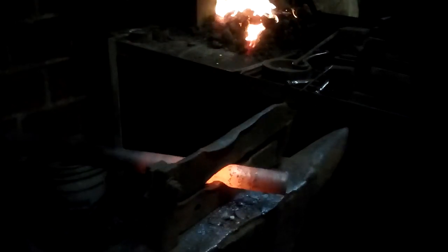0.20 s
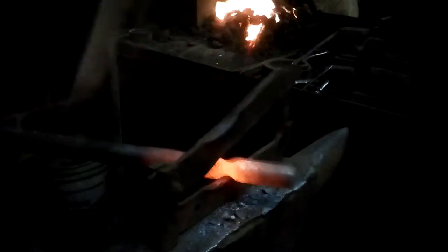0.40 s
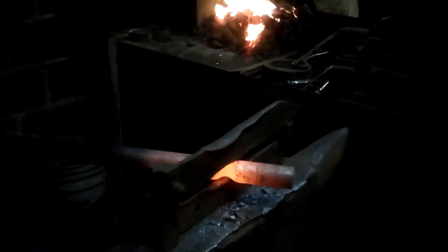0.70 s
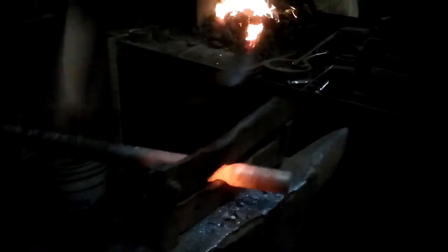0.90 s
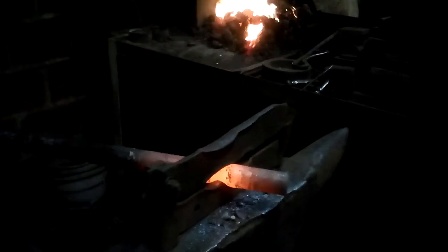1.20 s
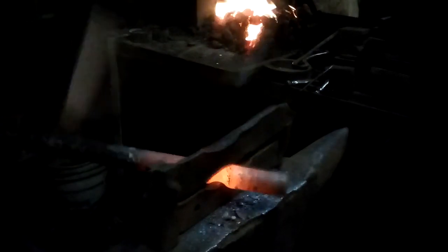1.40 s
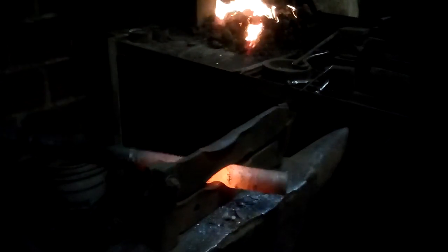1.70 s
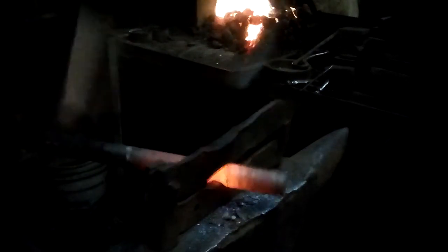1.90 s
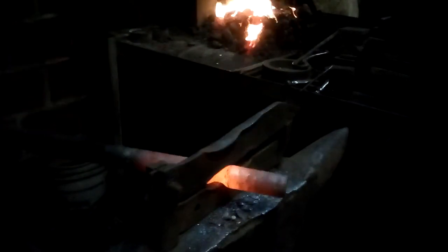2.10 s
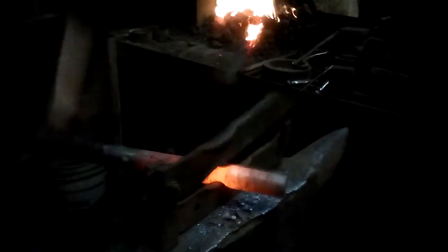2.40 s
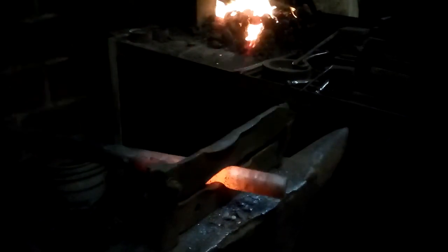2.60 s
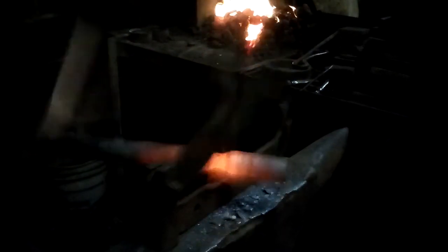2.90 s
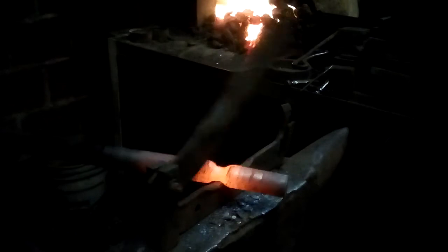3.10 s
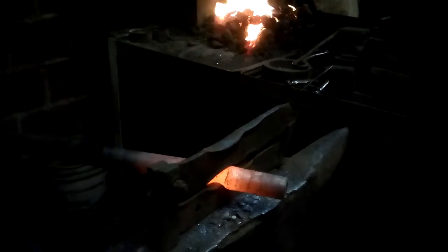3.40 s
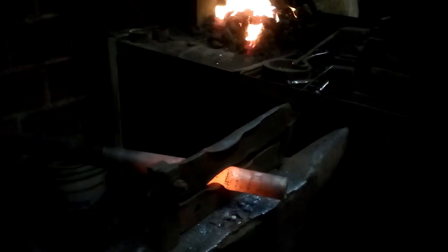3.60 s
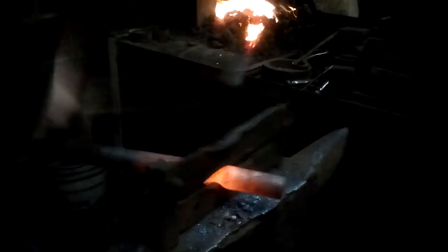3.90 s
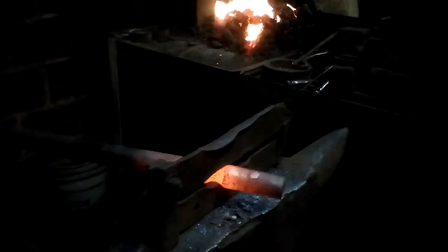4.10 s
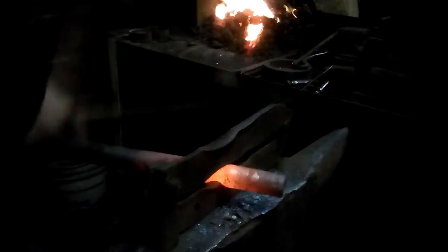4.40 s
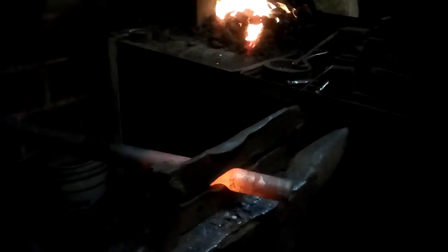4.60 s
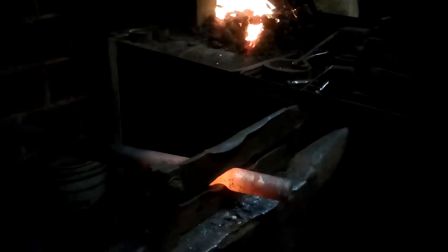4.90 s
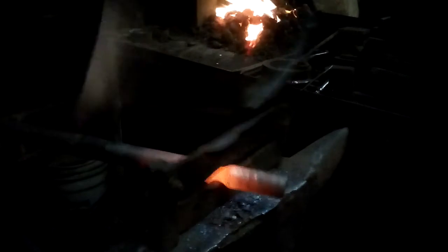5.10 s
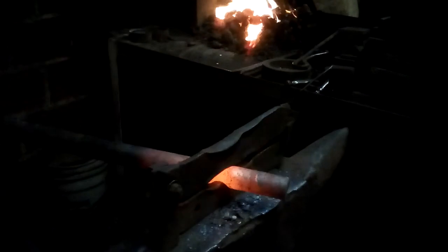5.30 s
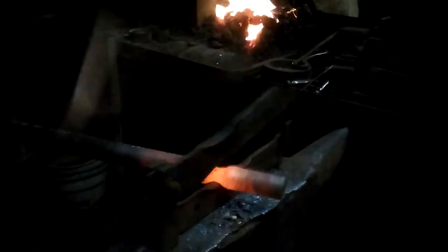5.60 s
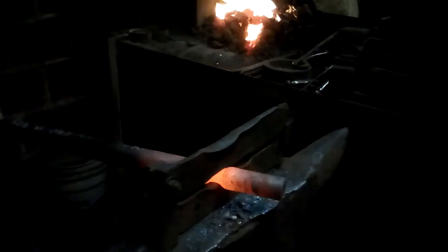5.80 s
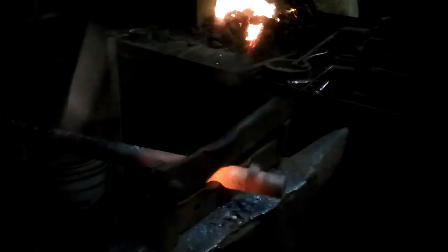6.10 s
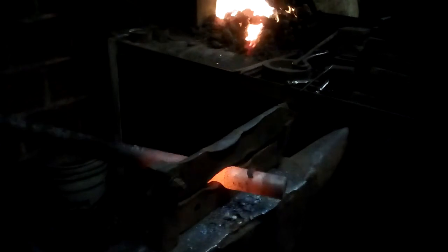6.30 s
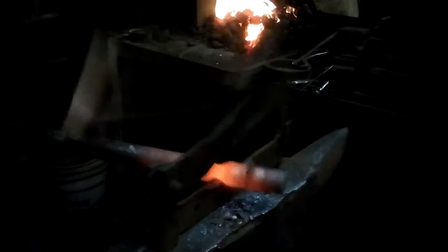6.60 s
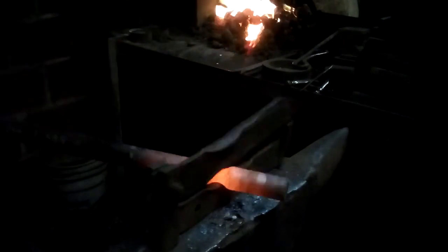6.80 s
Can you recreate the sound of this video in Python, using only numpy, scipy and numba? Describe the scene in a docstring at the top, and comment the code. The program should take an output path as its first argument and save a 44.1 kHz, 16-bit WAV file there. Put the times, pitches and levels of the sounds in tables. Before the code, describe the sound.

A hand hammer strikes a steel die on hot pipe about twice a second, bright ringing clangs with small rattles between, low fire murmur behind.

```python
"""A closed forge shop, one microphone near the anvil: the direct sound stands above the room's answer.
A hand hammer drives a steel die onto hot pipe about twice a second: noise-like clang and ringing modes.
The die rings, rebounds and rattles between blows; the pipe scrapes, and a coal fire murmurs behind.
The camera's gain control dives after every blow, holds the ringing at one level until it is fully open
again, and compressor and limiter flatten the first cycles."""
import sys
import numpy as np
from scipy import signal
from scipy.fft import rfft, irfft, next_fast_len
from scipy.io import wavfile
from scipy.ndimage import uniform_filter1d, minimum_filter1d, map_coordinates
from numba import njit

SR = 44100
rng = np.random.default_rng(int(sys.argv[2]) if len(sys.argv) > 2 else 0)


def unload_wav(signal):
    """Save mono or channel-first audio to the path in sys.argv[1] as 16-bit WAV at rate SR, clipped to [-1, 1]."""
    wavfile.write(
        sys.argv[1],
        SR,
        np.round(np.clip(np.atleast_2d(signal).T, -1, 1) * 32767).astype(np.int16),
    )


def how_loud(loudness_db):
    """Turn decibels into a plain amplitude multiplier (0 dB gives 1, 20 dB gives 10)."""
    steps = np.asarray(loudness_db, float) / 20
    return 10 ** steps


N = 306570  # length in samples


def unit(x):
    """Scaled to rms 1."""
    return x / np.sqrt(np.mean(x ** 2) + 1e-20)


def along(points, hz):
    """Reads (Hz, value) points on a log frequency axis."""
    f, v = np.transpose(points)
    return np.interp(np.log(hz + 1), np.log(f + 1), v)


def filtered(x, response):
    """x times a complex response of frequency."""
    m = next_fast_len(len(x) + 8192)
    return irfft(rfft(x, m) * response(np.fft.rfftfreq(m, 1 / SR)), m)[:len(x)]


def dying(noise, t60s):
    """Noise in which every frequency dies at its own speed."""
    hz, t, z = signal.stft(noise, SR, nperseg=256)
    fade = how_loud(-60 * t / along(t60s, hz)[:, None])
    return signal.istft(z * fade, SR, nperseg=256)[1][:len(noise)]


# The shop's reverberation: (frequency [Hz], time to fall 60 dB [s])
SHOP_T60 = [(200, 0.46), (3000, 0.5), (8000, .3), (12000, 0.15)]


def add(track, s, sound, wet_db):
    """Lays a sound at s seconds, with the shop's answer: a fresh tail of noise whose treble dies first."""
    tail = np.pad(dying(rng.standard_normal(len(sound)), SHOP_T60), (300, 0))  # starts 300 samples late
    answer = signal.fftconvolve(sound, tail / np.linalg.norm(tail))[:len(sound)]
    heard = sound + how_loud(wet_db) * answer
    start = round(s * SR)
    heard = heard[max(-start, 0):N - start]
    track[max(start, 0):][:len(heard)] += heard


# Fire and draught behind the anvil, and the camera's hiss: (frequency [Hz], relative density [dB per Hz])
FIRE_SPECTRUM = [(18, -28.5), (40, -2), (200, -1), (370, -9.5), (520, -18), (700, -12), (1400, -18),
                 (3600, -21), (6200, -21), (7900, -36), (10000, -55), (13500, -62), (15200, -28),
                 (16500, -36)]


def fire():
    """The coal fire and its draught: noise shaped to a low murmur, its level wavering slowly."""
    waver = map_coordinates(rng.standard_normal(60), [np.arange(N) * 6 / SR])  # six random points a second
    murmur = unit(filtered(rng.standard_normal(N), lambda hz: how_loud(along(FIRE_SPECTRUM, hz))))
    return how_loud(-53 + 3 * waver) * murmur


# The rub of pipe dragged on the anvil: (frequency [Hz], relative density [dB per Hz])
SCUFF_SPECTRUM = [(80, -28), (200, 15), (600, 3), (1500, 0), (3000, -40.5)]
# The pipe shifts on the anvil: (time [s], level before fading [dB], time to fall 60 dB [s])
PIPE_SHIFTS = [(3.999, -47, 0.44), (4.899, -35.5, 0.37)]


def scuff():
    """The pipe is shifted: soft, low scrapes of noise that swell in milliseconds and fade."""
    track, t = np.zeros(N), np.arange(SR // 2) / SR
    for s, db, t60 in PIPE_SHIFTS:
        rub = unit(filtered(rng.standard_normal(len(t)), lambda hz: how_loud(along(SCUFF_SPECTRUM, hz))))
        swell = 1 - np.exp(-t / 0.0035)
        add(track, s, swell * how_loud(db - 60 * t / t60) * rub, wet_db=-4.5)
    return track


MAIN_HZ = 4050  # centre of the loudest ring, heard while the die is off the pipe; pivot of the tilts
# Modes of the steel die: (frequency [Hz], relative level [dB])
DIE_MODES = [(942, -21), (1655, -16), (1846, -13), (2358, -12), (2575, -13), (2850, -13), (3060, -14),
             (3190, -12), (3235, -10), (3612, -12), (4048, -6), (4480, -11), (4565, -8), (5095, -14),
             (5163, -10), (5475, -9), (6089, -12), (7305, -14), (7757, -19), (8613, -22), (8888, -23),
             (9631, -28), (11047, -28), (11854, -25), (12979, -27), (13722, -31), (13900, -26),
             (14621, -23), (15025, -24), (15595, -20)]


def strengths(scatter_db, tilt_db, favoured_hz):
    """Each contact excites the modes anew, slightly repitched; the one nearest favoured_hz is always strong."""
    hz, db = np.transpose(DIE_MODES)[..., None]
    chance = rng.standard_normal((2, len(DIE_MODES), 1))
    distance_hz = abs(hz - favoured_hz)
    favoured = distance_hz == distance_hz.min()
    tilt = tilt_db * np.log2(hz / MAIN_HZ)
    db = db + tilt + np.where(favoured, 11, scatter_db * chance[0])
    return hz * (1 + 0.00095 * chance[1]), db


# Decay of the die's modes, before any extra damping: (frequency [Hz], time to fall 60 dB [s])
DIE_DECAY = [(1000, .5), (4000, .45), (9000, .27), (15000, .2)]


def ring(t, hz, db):
    """The die's modes ringing freely: a sum of dying sines."""
    fade = how_loud(db - 60 * t / along(DIE_DECAY, hz))
    return np.sum(fade * np.sin(2 * np.pi * hz * t), 0)


# Light rattles of die, pipe and tongs: (time [s], level [dB], centre frequency [Hz])
RATTLES = [(0.422, 2, 2380), (0.548, -8.5, 1880), (0.5615, 0, 3120), (0.826, -23, 2620),
           (0.985, -0.5, 3500), (1.222, -31, 1520), (1.69, -16, 3520), (1.75, -23, 1450),
           (1.8757, -15, 3000), (2.218, -19.5, 3300), (2.447, 8, 3030), (2.525, -6, 2600),
           (2.6956, -15, 3370), (2.746, -18.5, 2940), (2.806, -20, 3080), (3.036, -2.5, 2430),
           (3.099, -9, 3000), (3.778, -38, 3940), (3.852, -20, 3120), (4.56, -1, 3600), (4.611, -4, 4000),
           (4.958, -24.5, 2780), (5.233, -5, 3080), (6.421, -19.5, 3040), (6.479, -31.5, 3950),
           (6.52, -37, 1210), (6.8105, 9, 3900), (6.89, -8.5, 3480)]


def rattle():
    """Each light contact: a short puff of noise around its centre pitch and a weak, damped ring of the die."""
    track, t = np.zeros(N), np.arange(SR // 2) / SR
    puff_t60_s = .028
    ring_db, ring_t60_s = -15, .07  # under the puff; damping added to the modes' own decay
    for s, db, hz in RATTLES:
        def body(f):
            band = 1j * f * hz / (hz * hz - f * f + 1j * f * hz * 0.61)
            corner_hz = 13000 * how_loud(0.22 * db)  # harder is brighter
            return band ** 2 / (1 + (f / corner_hz) ** 4)

        puff = unit(filtered(rng.standard_normal(len(t)), body)) * how_loud(-60 * t / puff_t60_s)
        modes = strengths(scatter_db=6.9, tilt_db=-1.5, favoured_hz=hz)
        die = how_loud(ring_db - 60 * t / ring_t60_s) * ring(t, *modes)
        rise = 1 - np.exp(-t / 0.00032)
        add(track, s, how_loud(db) * rise * (puff + die), wet_db=-14)
    return track


# Anvil, stand and pipe, before the tilt of each blow: (frequency [Hz], relative density [dB per Hz])
IRON_SPECTRUM = [(24, -50), (40, -29), (177, 0), (233, -4.5), (624, -7.5), (1230, -9), (1890, -1.5),
                 (3290, 1), (4020, -3.5), (6300, -2), (7900, -14), (8600, -16), (11000, -17.5),
                 (13000, -18.5), (15400, -20), (16500, -41)]
# Decay of that iron: (frequency [Hz], time to fall 60 dB [s])
IRON_DECAY = [(100, 0.69), (500, 0.64), (2000, 0.55), (5000, 0.54), (9000, 0.33), (15000, 0.22)]


def clang(t, tilt_db, mode_hz, mode_db):
    """The iron around the die: noise with crowded partials and wavering die modes, under a fast crack."""
    lumps = rng.standard_normal(600)  # crowded short partials, about 30 Hz apart

    def body(hz):
        tilt = tilt_db * np.log2((hz + 200) / MAIN_HZ)
        lump = np.interp(hz / 30, np.arange(len(lumps)), lumps)
        return how_loud(along(IRON_SPECTRUM, hz) + tilt + 3.2 * np.clip(hz / 900, 0, 1) * lump)

    def lines(hz):
        # the die chatters on the pipe, so its modes go on as wavering lines
        level = how_loud(mode_db + 8.4 + 5.2 * np.log2(mode_hz / MAIN_HZ))
        half_width_hz = 7 + 0.0006 * mode_hz
        return np.sum(level / np.hypot(1, ((hz - mode_hz) / half_width_hz) ** 2), 0)

    iron = unit(filtered(rng.standard_normal(len(t)), lambda hz: body(hz) + lines(hz)))
    crack = how_loud(-2 - 60 * t / .05) * iron  # the same iron, dying fast
    return dying(iron, IRON_DECAY) + crack


# Blows and hard rebounds: (time [s], strength [dB], main ring [dB], time the die rings free [s],
# mode that the point of impact favours [Hz])
HAMMER_BLOWS = [(-.15, 3.5, -4, .03, 6089), (0.3577, 1.5, 7.5, 0.013, 1846), (0.573, -17, -3.5, 0.05, 4048),
                (0.879, 0.5, 9, 0.056, 8613), (1.3902, 2.5, 4, 0.025, 5140), (1.8949, 3, 9, 0.014, 4565),
                (2.3962, 3.5, 7.5, 0.068, 5163), (2.9078, 4, 9, 0.06, 7305), (3.258, -16, -14, 0.021, 3612),
                (3.273, -16, -6.5, 0.0226, 4565), (3.9368, 1.5, 3, 0.021, 4565),
                (4.4656, 2, 2, 0.016, 4480), (5.075, 3.5, 7.5, 0.041, 2575),
                (5.5916, 2.5, 5.5, 0.089, 8613), (5.75, -21.5, -4.5, 0.015, 3235),
                (6.097, 1.5, 4, 0.044, 7757), (6.6115, 3.5, 8.5, 0.025, 7305)]


def hammer():
    """Each blow: crack and clang of the iron, and the die ringing free until it lands on the pipe again."""
    track, t = np.zeros(N), np.arange(SR * 4 // 5) / SR
    for s, db, main_db, free_s, favoured_hz in HAMMER_BLOWS:
        tilt_db = 1.2 + .06 * db  # per octave: a harder blow is brighter
        mode_hz, mode_db = strengths(2.0, tilt_db - .3, favoured_hz)
        iron = how_loud(db) * clang(t, tilt_db, mode_hz, mode_db)
        die = how_loud(db - .6) * ring(t, mode_hz, mode_db)
        # two close modes beat
        pair = 2 * np.pi * MAIN_HZ * (1 + .003 * rng.standard_normal(2))
        beating = np.sin(pair[0] * t) + .3 * np.sin(pair[1] * 1.015 * t)
        main = how_loud(main_db - 60 * t / .35) * beating
        # landing damps the die at once, leaving a faint rest
        free = 1 / (1 + np.exp(np.clip((t - free_s) / 0.00025, -50, 50)))
        rise = 1 - np.exp(-t / 0.0004)
        add(track, s, rise * (iron + die * (0.1 + free) + main * (0.015 + free)), wet_db=-12)
    return track


def scene():
    """All sources summed at one microphone."""
    return (fire() + scuff() + rattle() + hammer())[None]


@njit
def follow(wanted, start, down, fastest, up):
    """The gain in dB creeps toward the wanted gain; going down it has a top speed."""
    out = np.empty_like(wanted)
    for i in range(len(wanted)):
        gap = wanted[i] - start
        start += max(gap * down, -fastest) if gap < 0 else gap * up
        out[i] = start
    return out


def running_level(x, window_s):
    """Level in dB of the power, smoothed exponentially."""
    keep = np.exp(-1 / (window_s * SR))
    return 10 * np.log10(signal.lfilter([1 - keep], [1, -keep], x ** 2) + 1e-9)


def gain_control(x, target_db, start_db, window_s, lag_s, attack_s, dive_db, release_s):
    """Turns down whatever is louder than the target, a little late; dives at most dive_db a second."""
    level_db = running_level(x, window_s)
    late_db = np.interp(np.arange(N) - lag_s * SR, np.arange(N), level_db)
    wanted = np.minimum(target_db - late_db, 0)
    gain_db = follow(wanted, start_db, 1 / (attack_s * SR), dive_db / SR, 1 / (release_s * SR))
    return x * how_loud(gain_db)


def squeeze(x, knee_db, ratio, window_s, ahead_s):
    """A quick compressor that looks ahead: flattens what rises over the knee, and ducks just before a blow."""
    ahead = round(ahead_s * SR)
    cut_db = -(1 - 1 / ratio) * np.maximum(running_level(x, window_s) - knee_db, 0)
    cut_db = minimum_filter1d(cut_db, size=ahead, origin=-(ahead // 2))
    return x * how_loud(uniform_filter1d(cut_db, size=65))


def limiter(x, top):
    """Holds the peaks near the ceiling, following them within a cycle or two of the main ring."""
    needed = np.minimum(top / (np.abs(x) + 1e-9), 1)
    return x * uniform_filter1d(minimum_filter1d(needed, size=21), size=15)


def band_limit(x):
    """A steep low-pass at the top of the band."""
    return signal.sosfilt(signal.butter(12, 17160, fs=SR, output="sos"), x)


def record(dry):
    """The camera's microphone channel: gain control, compressor, limiter, a little overload, band limits."""
    x = gain_control(dry[0], target_db=-18.5, start_db=-15, window_s=0.0096, lag_s=0.0037,
                     attack_s=0.028, dive_db=795, release_s=0.012)
    x = squeeze(x, knee_db=-13, ratio=1.8, window_s=.002, ahead_s=.014)
    x = limiter(x, top=.85)
    x = x / (1 + np.abs(x / .8) ** 8) ** (1 / 8)  # overload bends the peaks below .8
    # gentle low cut at 30 Hz, steep top at 16400 Hz
    x = filtered(x, lambda hz: (1j * hz / (30 + 1j * hz)) / (1 + (hz / 16400) ** 60))
    return band_limit(x[None])


dry = scene()
out = record(dry)
unload_wav(out)
```